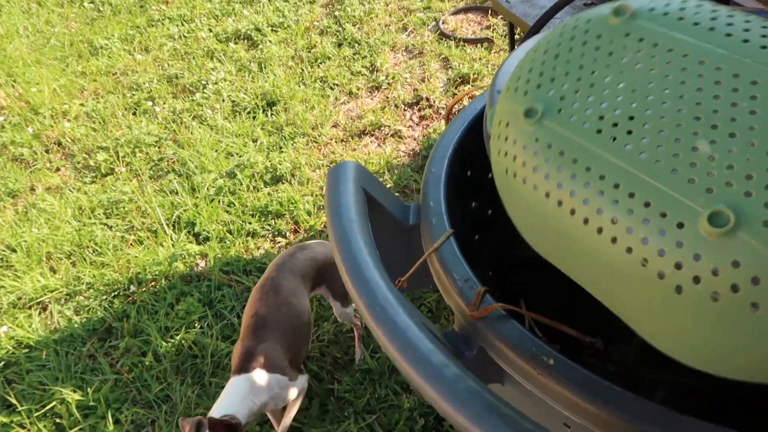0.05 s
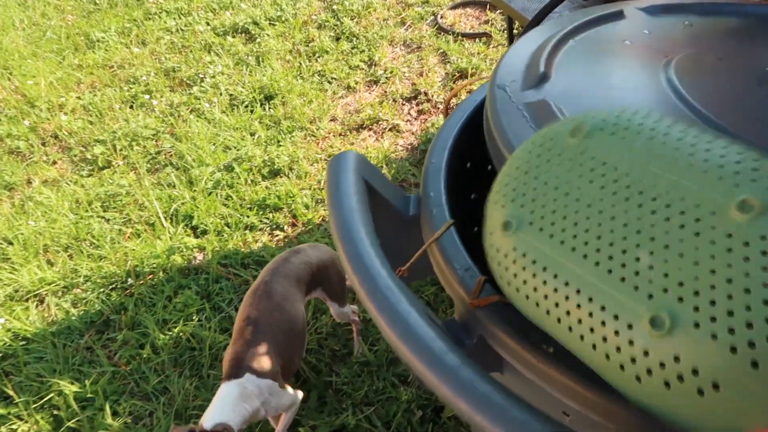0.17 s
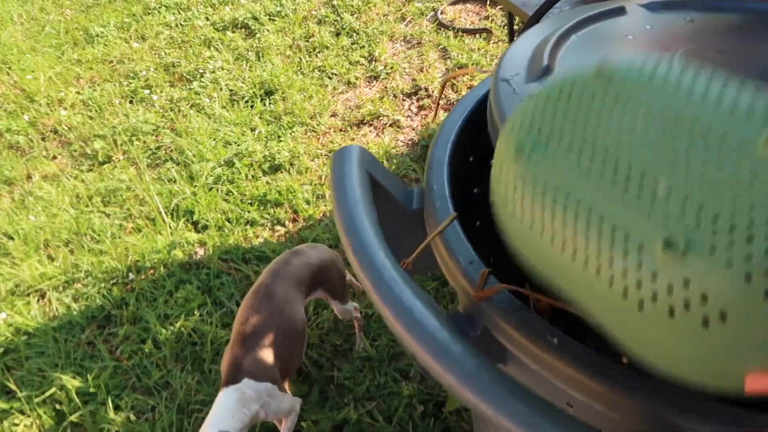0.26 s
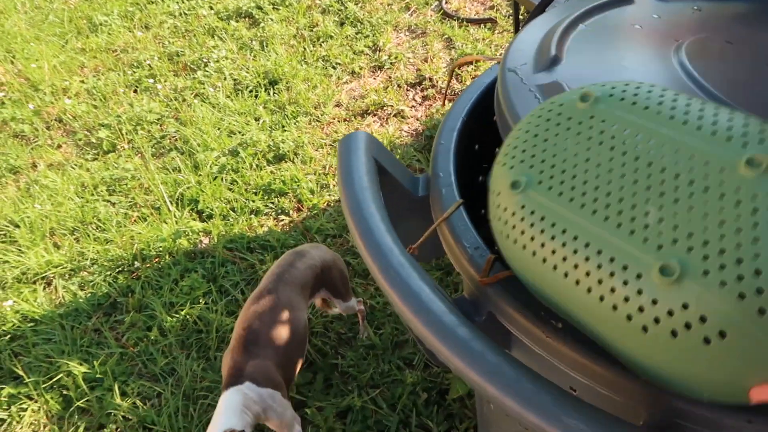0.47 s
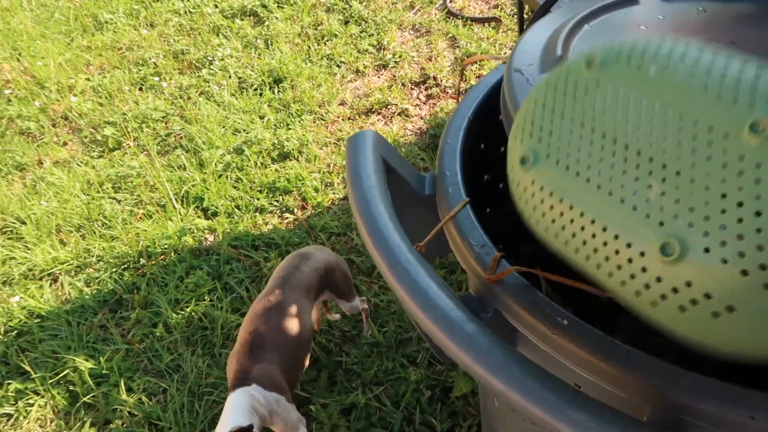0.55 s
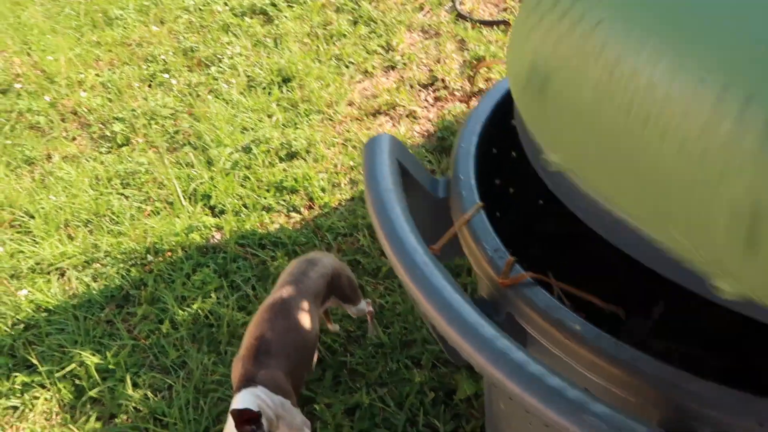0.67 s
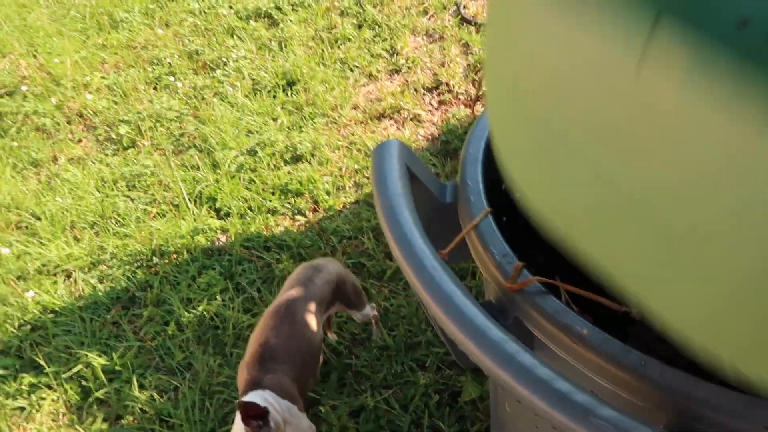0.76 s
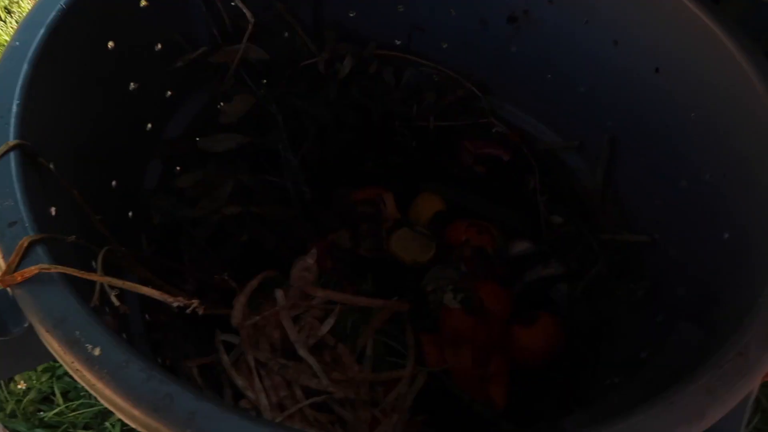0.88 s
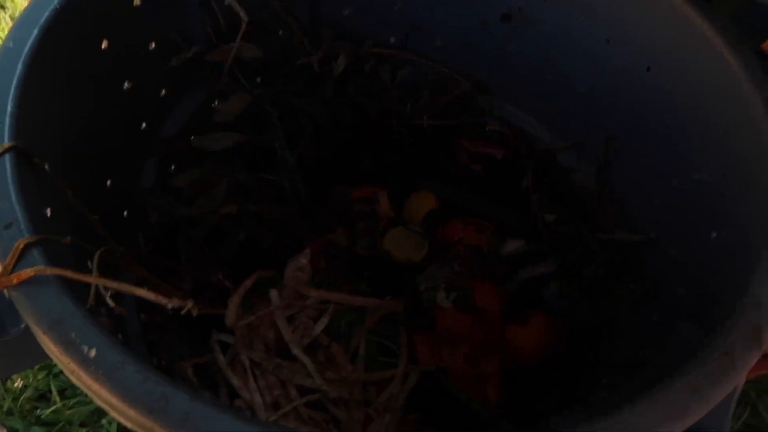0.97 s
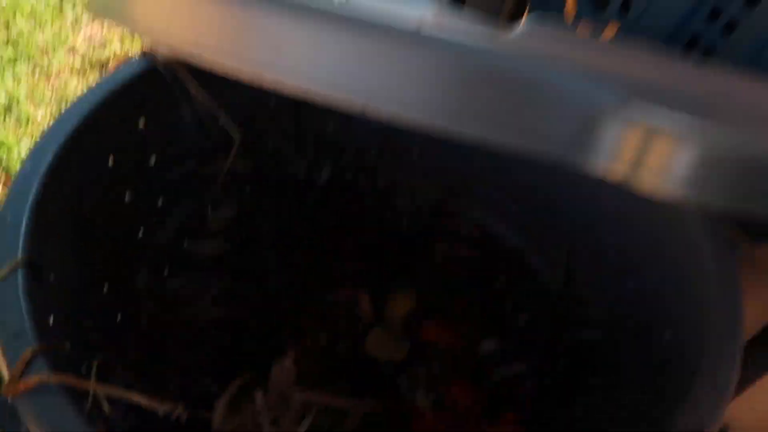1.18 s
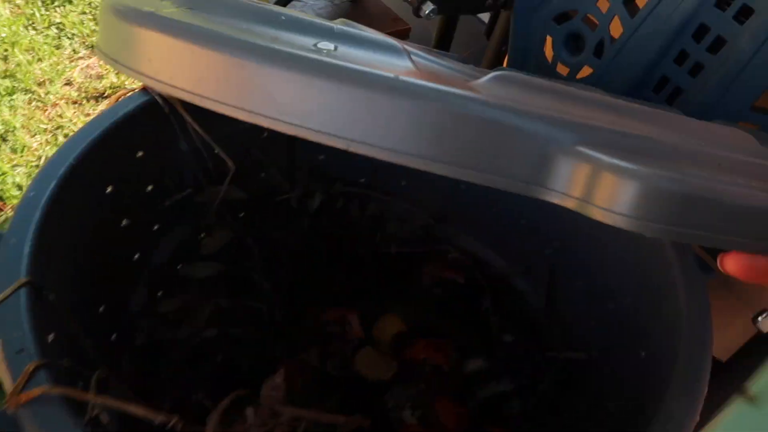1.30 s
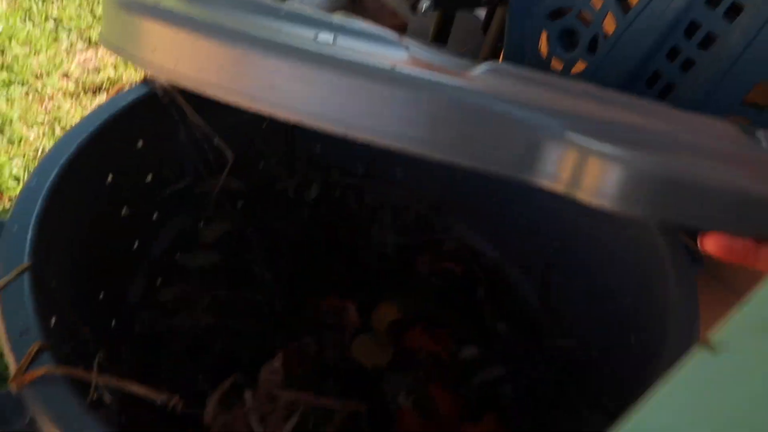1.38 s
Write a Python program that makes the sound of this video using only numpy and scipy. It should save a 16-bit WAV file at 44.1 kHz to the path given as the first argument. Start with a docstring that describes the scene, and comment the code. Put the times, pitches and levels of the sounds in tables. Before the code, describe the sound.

After a brief quiet yard hum, a colander whacks a plastic barrel very hard, bounces, and strikes again a quarter second later; then low thumps and tiny plastic ticks, heard close in stereo outdoors.

```python
"""A yard hums, rumbles and hisses faintly: drifting coloured noise under a drone of wavering sines.
A plastic colander skids on the rim of a plastic compost bin, strikes it hard and bounces twice; after a soft
bump it skids and strikes again and bounces once. Noise cracks and damped modes give a short clack from
the stiff wall and a longer ring from the hollow barrel; overload makes the recorder duck the whole sound.
Then the plastic ticks, bumps and rustles as it is handled: short noise bands, low modes and fine grains."""
import sys
import numpy as np
from scipy import signal
from scipy.fft import rfft, irfft, next_fast_len
from scipy.io import wavfile
from scipy.ndimage import map_coordinates

SR = 44100
rng = np.random.default_rng(int(sys.argv[2]) if len(sys.argv) > 2 else 0)


def generate_wav(signal):
    """Clip the signal to [-1, 1] and save it as 16-bit WAV at the path in sys.argv[1]."""
    frames = np.transpose(np.atleast_2d(signal))
    scaled = np.clip(frames, -1, 1) * 32767
    pcm = np.round(scaled).astype(np.int16)
    wavfile.write(sys.argv[1], SR, pcm)


N = 63945

# Yard background. Each row: time in seconds, rumble level in dB, hiss level in dB.
YARD_LEVELS = [(0, -41, -47.5), (.2, -37.5, -45.5), (.4, -38.5, -46), (.8, -41, -46.5), (.9, -38.5, -47),
               (.95, -36, -46.5), (1.05, -40, -46.5), (1.17, -41, -46), (1.23, -39.5, -47),
               (1.29, -38, -46.5), (1.45, -40, -44.5)]
# Tone of the low rumble and of the airy hiss. Each row: frequency in Hz, gain in dB.
RUMBLE_COLOUR = [(15, -33.5), (28, -9.5), (58, -3.5), (82, -1.5), (120, -4), (200, -6), (280, -9),
                 (345, -4), (430, -18), (700, -32), (2000, -71.5)]
HISS_COLOUR = [(100, -14), (400, 0.5), (780, 2), (1100, -4), (2000, -11.5), (4700, -22), (7000, -28),
               (10500, -36), (15000, -50.5)]
# Stereo likeness of the yard. Each row: frequency in Hz, left-right correlation (limited to -1..1 in use).
YARD_LIKENESS = [(60, 1), (130, .88), (300, .78), (700, 0.53), (1400, 0.96), (3000, 0), (10000, -1.6)]
# Partials of the drone. Each row: frequency in Hz, level in dB before the waver.
DRONE = [(59, -48.5), (80, -48.5), (238, -52.5), (322, -55)]
HISS_PAN_DB, DRONE_KNOTS_PER_S = 3.55, 17  # hiss leans left; speed of the drone's waver

# Skids leading into the full blows. Each row: end in seconds, peak level in dB.
SKIDS = [(0.2057, -11), (0.472, -26)]
# Tone of the skid. Each row: frequency in Hz, gain in dB.
SKID_COLOUR = [(100, -21.5), (800, 1), (2200, -1), (5000, -4.5), (10000, -22.5), (15000, -46)]
SKID_S = 0.0036  # length of the swell

# Blows and bounces on the rim. Each row: start in seconds, level in dB, contact brightness in Hz,
# extra crack in dB, factor on the wall's ring times, left-right difference in dB.
KNOCKS = [(0.2048, 18.5, 3290, -3, 1.1, 2.5), (0.2297, -7.5, 6800, -4.5, 0.45, 3.5),
          (0.2522, 1.5, 2434, 4.5, 0.83, 4), (0.472, 13, 4350, 1, 0.45, 0), (0.5241, 4, 4400, -3, 0.58, 0)]
# Modes of the struck wall. Each row: frequency in Hz, level in dB, 60 dB decay in seconds at ring factor 1.
WALL_MODES = [(240, -19.5, 0.12), (850, 0, 0.03), (1080, -17.5, 0.022), (1391, -5, 0.0076),
              (1778, -13, 0.01), (2210, -19, 0.0039), (2917, -20, 0.0051), (4564, -23, .006)]
# Modes of the hollow barrel. Each row: frequency in Hz, level in dB, 60 dB decay in seconds.
BARREL_MODES = [(241, -17.5, 0.14), (458, -41.5, 0.065), (642, -24, 0.11), (746, -14.5, .1),
                (837, -19.5, 0.062), (948, -22.5, .1), (988, -27.5, 0.028), (1084, -24, 0.074),
                (1117, -13.5, 0.064), (1356, -23, 0.028), (1585, -22.5, .06), (1734, -20, 0.066),
                (1867, -20, 0.02), (2553, -24.5, 0.029), (2964, -32.5, .05)]
# Tone of the crack at contact. Each row: frequency in Hz, gain in dB.
CRACK_COLOUR = [(100, -25.5), (1000, 7), (2400, -2.5), (5000, -10.5), (8000, -19), (11000, -25.5),
                (15000, -39)]
# Dense ringing of bin and lid, tone. Each row: frequency in Hz, gain in dB.
SHELL_COLOUR = [(40, -8.5), (180, 1), (350, -5.5), (540, -8.5), (720, -3), (1250, -4), (2200, -15.5),
                (3800, -15.5), (6000, -30), (10000, -31), (15000, -60.5)]
# Dense ringing of bin and lid, decay. Each row: frequency in Hz, 60 dB decay in seconds.
SHELL_T60 = [(200, 0.6), (600, 0.36), (1500, 0.052), (4000, 0.095), (10000, 0.036)]
# The clack coming back from inside the bin. Each row: delay in seconds, level in dB.
INNER_ECHOES = [(.0065, -6.5), (.011, -16), (.0158, -17.5)]
# Tone of the yard's echo. Each row: frequency in Hz, gain in dB.
YARD_ECHO_COLOUR = [(100, -17.5), (400, -2), (1000, -3), (2000, -1), (3600, -11.5), (6000, -20.5),
                    (15000, -51)]
# Stereo likeness of crack and shell. Each row: frequency in Hz, left-right correlation.
KNOCK_LIKENESS = [(200, .97), (1000, 1), (3000, 0.42), (8000, .3)]
# How far each pitch region follows a blow's pan. Each row: frequency in Hz, share of the left-right dB.
PAN_SHARE = [(100, -0.9), (800, 1.33), (3000, 0.2), (8000, 0.5)]
CRACK_DB, CRACK_T60_S = -11, 0.024
SHELL_DB, BARREL_BUILD_S = -22, 0.0035
YARD_ECHO_DB, YARD_ECHO_T60_S = -34, 0.28
MODE_SCATTER_DB = 1.5  # standard deviation of each mode's level
RADIATION_HZ = 340  # the wall hardly radiates below this

# Soft bumps of the bin. Each row: start in seconds, level in dB, pitch in Hz.
BUMPS = [(0.422, -31, 195), (0.933, -35.5, 62), (.956, -35, 235), (1.154, -18, 57), (1.274, -35, 74)]
# Small handling ticks. Each row: start in seconds, level in dB, pitch in Hz.
TICKS = [(.8785, -54, 2500), (0.891, -48.5, 4400), (.921, -44.5, 3700), (0.96, -55.5, 8200),
         (1.005, -48.5, 4120), (1.088, -46.5, 4450), (1.129, -49, 4260), (1.172, -43, 4600)]
BUMP_T60_S, TICK_T60_S = 0.12, 0.017
TICK_WIDTH_OCT = 0.24  # distance from the pitch at which gain is halved

# Tone of the rustle. Each row: frequency in Hz, gain in dB.
RUSTLE_COLOUR = [(300, -22.5), (1500, -1.5), (4500, 7), (7000, -5), (11000, -16), (15000, -35)]
RUSTLE_START_S, RUSTLE_DB = 0.875, -64
SLIPS_PER_S, SLIP_SPREAD_DB, GRAIN_S = 250, 3.5, 0.003

LEFT_LEAD_S = 0.000045
TRIGGER, HOLD_S = 2.5, 0.391  # overload threshold as amplitude; hold time of the duck
DUCK_DB, DUCK_ATTACK_S, DUCK_RELEASE_S = 13, 0.0089, 0.0067
CLIP_HARDNESS = 14  # higher gives a sharper knee
TOP_HZ, TOP_EDGE_HZ = 15200, 350  # top of the recorder's range and softness of its edge


def amp(db):
    """Decibels to gain."""
    return 10 ** (np.asarray(db) / 20)


def unit(x):
    """Scale to rms 1."""
    return x / np.sqrt(np.mean(x ** 2) + 1e-20)


def along(points, hz):
    """Read (Hz, value) points on a log frequency axis."""
    f, v = np.transpose(points)
    return np.interp(np.log(hz + 1), np.log(f + 1), v)


def clock():
    """Seconds at every sample."""
    return np.arange(N) / SR


def fade(t60):
    """Exponential decay, down 60 dB after t60 seconds."""
    return np.exp(-np.log(1000) * clock() / t60)


def pan(db):
    """Left and right gains for a level difference; positive leans left."""
    return amp(np.array([[1], [-1]]) * db / 2)


def delayed(x, s):
    """x starting s seconds later."""
    gap = max(round(s * SR), 0)
    return np.pad(x, [(0, 0)] * (x.ndim - 1) + [(gap, 0)])[..., :N]


def filtered(x, response):
    """x shaped by a response of frequency, with padding against wrap-around."""
    m = next_fast_len(N + SR // 2)
    return irfft(rfft(x, m) * response(np.fft.rfftfreq(m, 1 / SR)), m)[..., :N]


def wobble(rate):
    """A smooth random curve through rate knots a second."""
    return map_coordinates(rng.standard_normal(N // 100), [clock() * rate], mode="mirror")


def noise(colour, likeness):
    """Coloured stereo noise of rms 1; the mid-side balance sets the left-right correlation."""
    def mid_side(hz):
        angle = np.arccos(np.clip(along(likeness, hz), -1, 1)) / 2
        return amp(along(colour, hz)) * [np.cos(angle), np.sin(angle)]

    mid, side = filtered(rng.standard_normal((2, N)), mid_side)
    return unit(np.array([mid + side, mid - side]))


def ring(modes):
    """Damped sine modes, each a little stronger or weaker at every call."""
    out = np.zeros(N)
    for hz, db, t60 in modes:
        level = amp(db + MODE_SCATTER_DB * rng.standard_normal())
        out += level * fade(t60) * np.sin(2 * np.pi * hz * clock())
    return out


def yard():
    """Low rumble and airy hiss drift in level over a drone whose partials waver in level and phase."""
    t = clock()
    s, rumble_db, hiss_db = np.transpose(YARD_LEVELS)
    rumble = amp(np.interp(t, s, rumble_db)) * noise(RUMBLE_COLOUR, YARD_LIKENESS)
    hiss = amp(np.interp(t, s, hiss_db)) * pan(HISS_PAN_DB) * noise(HISS_COLOUR, YARD_LIKENESS)
    drone = np.zeros(N)
    for hz, db in DRONE:
        waver = wobble(DRONE_KNOTS_PER_S) + 1j * wobble(DRONE_KNOTS_PER_S)
        drone += amp(db) * np.real(waver * np.exp(2j * np.pi * hz * t))
    return rumble + hiss + drone


def skids():
    """A noisy scrape swells for a few milliseconds and stops as the blow lands."""
    t = clock()
    swell = np.zeros(N)
    for s, db in SKIDS:
        swell += amp(db) * np.clip(1 - (s - t) / SKID_S, 0, 1) * (t < s)
    return swell * noise(SKID_COLOUR, YARD_LIKENESS)


def shell():
    """Countless weak modes of bin and lid, as noise with its own decay time at each frequency."""
    hz, t, z = signal.stft(noise(SHELL_COLOUR, KNOCK_LIKENESS), SR, nperseg=256)
    decay = np.exp(-np.log(1000) * t / along(SHELL_T60, hz)[:, None])
    return amp(SHELL_DB) * signal.istft(z * decay, SR)[1][:, :N]


def knocks():
    """Each blow cracks and flexes the wall, echoes inside the bin and sets the barrel ringing."""
    out = np.zeros((2, N))
    for s, db, bright_hz, crack_db, ring_factor, pan_db in KNOCKS:
        wall = -ring([(hz, level, t60 * ring_factor) for hz, level, t60 in WALL_MODES])
        build = 1 - np.exp(-clock() / BARREL_BUILD_S)
        hollow = (shell() - ring(BARREL_MODES)) * build
        echo_noise = noise(YARD_ECHO_COLOUR, YARD_LIKENESS)
        outside = amp(YARD_ECHO_DB) * fade(YARD_ECHO_T60_S) * echo_noise
        crack_noise = noise(CRACK_COLOUR, KNOCK_LIKENESS)
        crack = amp(CRACK_DB + crack_db) * fade(CRACK_T60_S) * crack_noise
        inside = sum(amp(level) * delayed(wall + crack, delay) for delay, level in INNER_ECHOES)

        def contact_and_pan(hz):
            # a softer contact has a lower brightness: second-order low-pass
            contact = 1 / (1 + 1j * np.sqrt(2) * hz / bright_hz - (hz / bright_hz) ** 2)
            return contact * pan(pan_db * along(PAN_SHARE, hz))

        blow = filtered(crack + wall + inside + hollow + outside, contact_and_pan)
        out += amp(db) * delayed(blow, s)
    return filtered(out, lambda hz: (1j * hz / (RADIATION_HZ + 1j * hz)) ** 2)


def handling():
    """Dull bumps are single damped modes with a soft onset; light ticks are fading bands of noise."""
    out = np.zeros((2, N))
    for s, db, pitch_hz in BUMPS:
        onset = 1 - np.exp(-clock() * pitch_hz)
        out += delayed(ring([(pitch_hz, db, BUMP_T60_S)]) * onset, s)
    for s, db, pitch_hz in TICKS:
        def band(hz):
            return 1 / (1 + (np.log2((hz + 1) / pitch_hz) / TICK_WIDTH_OCT) ** 2)

        tick = unit(filtered(rng.standard_normal((2, N)), band)) * fade(TICK_T60_S)
        out += amp(db) * delayed(tick, s)
    return out


def rustle():
    """Fine scraping while colander and lid are moved: random slips, each a fading grain of noise."""
    starts = rng.random(N) < SLIPS_PER_S / SR
    slips = starts * amp(SLIP_SPREAD_DB * rng.standard_normal(N))
    grains = signal.fftconvolve(slips, np.exp(-clock() / GRAIN_S))[:N]
    moving = clock() > RUSTLE_START_S
    return amp(RUSTLE_DB) * unit(grains) * moving * noise(RUSTLE_COLOUR, YARD_LIKENESS)


def scene():
    """The bin and the yard around it; sound reaches the left microphone a little earlier."""
    sound = yard() + skids() + knocks() + handling() + rustle()
    sides = np.array([[1], [-1]])
    return filtered(sound, lambda hz: np.exp(1j * np.pi * hz * LEFT_LEAD_S * sides))


def record(dry):
    """Overload ducks the gain, which holds and then returns; what still overshoots is soft-clipped."""
    t = clock()
    over = np.abs(dry).max(axis=0) > TRIGGER
    last_over = np.maximum.accumulate(np.where(over, t, -1))  # -1 s: no overload yet
    since = t - last_over
    held = np.clip(1 - (since - HOLD_S) / DUCK_RELEASE_S, 0, 1)
    size = max(round(DUCK_ATTACK_S * SR), 1)
    duck = np.convolve(held, np.ones(size) / size)[:N]  # running mean slopes both edges
    x = dry * amp(-DUCK_DB * duck)
    clipped = x / (1 + np.abs(x) ** CLIP_HARDNESS) ** (1 / CLIP_HARDNESS)
    return filtered(clipped, lambda hz: (1 - np.tanh((hz - TOP_HZ) / TOP_EDGE_HZ)) / 2)


dry = scene()
out = record(dry)
generate_wav(out)
```